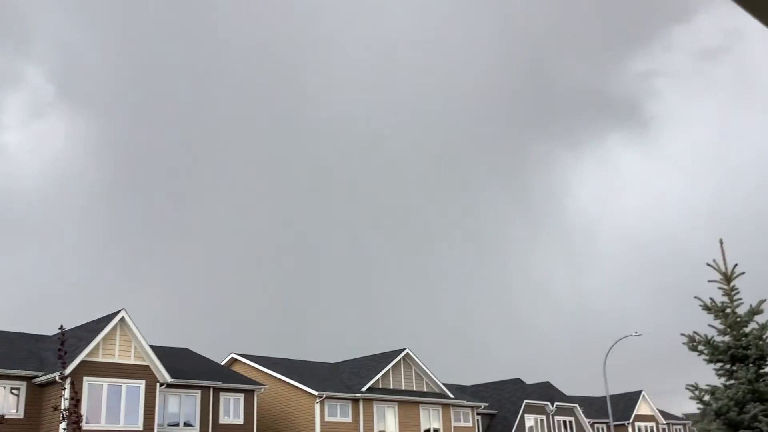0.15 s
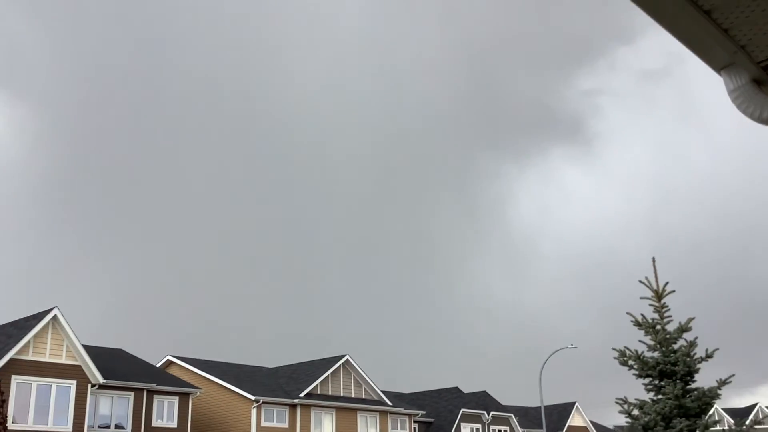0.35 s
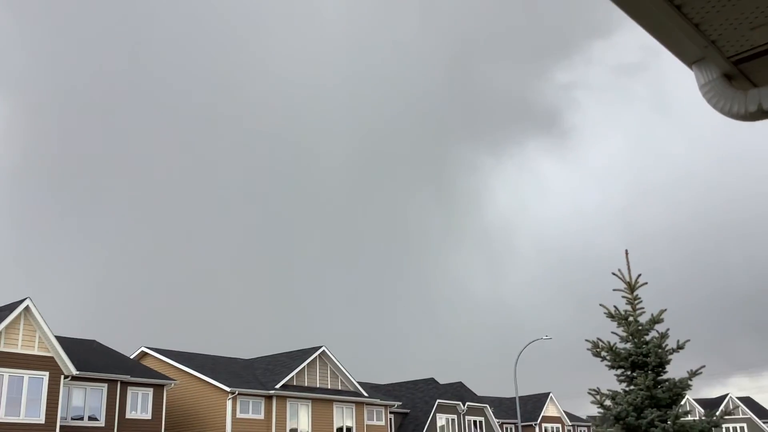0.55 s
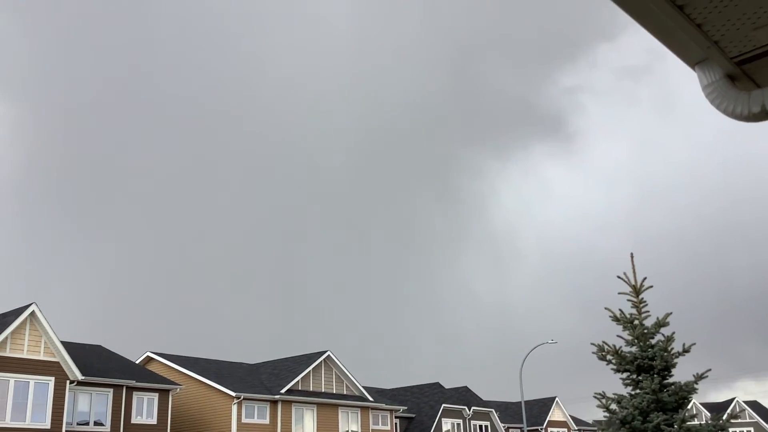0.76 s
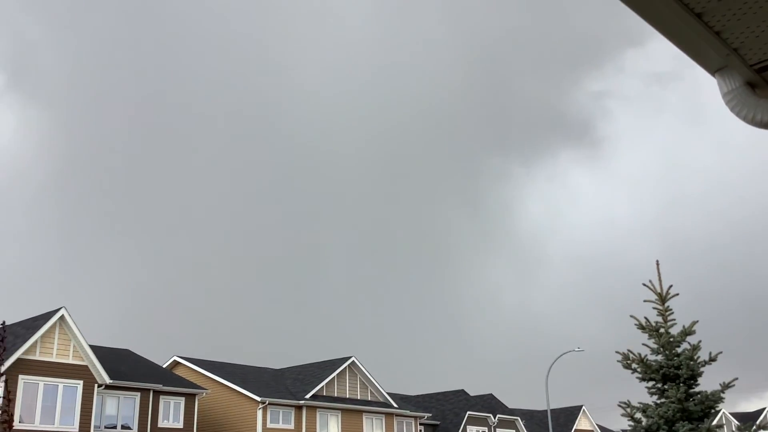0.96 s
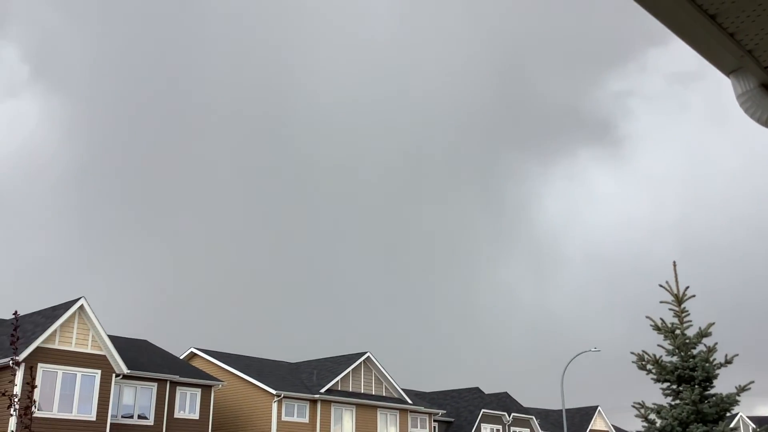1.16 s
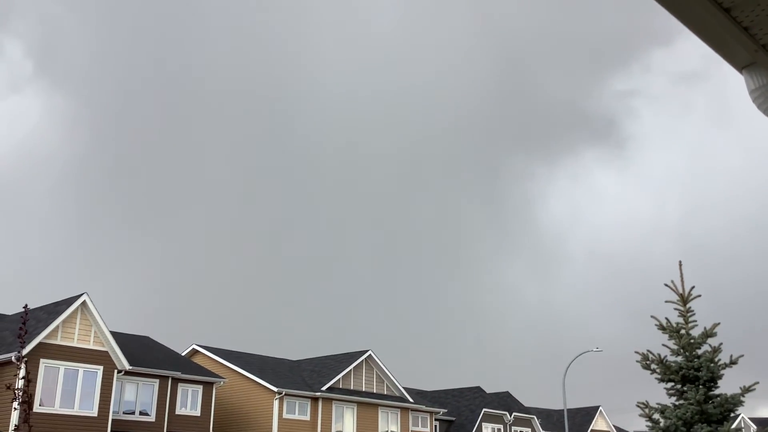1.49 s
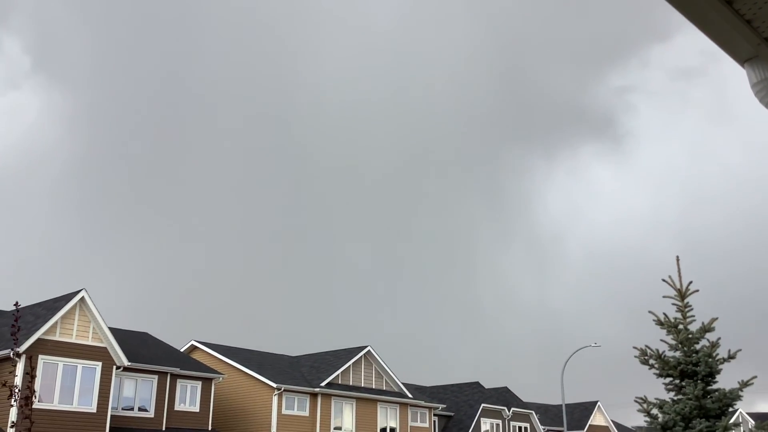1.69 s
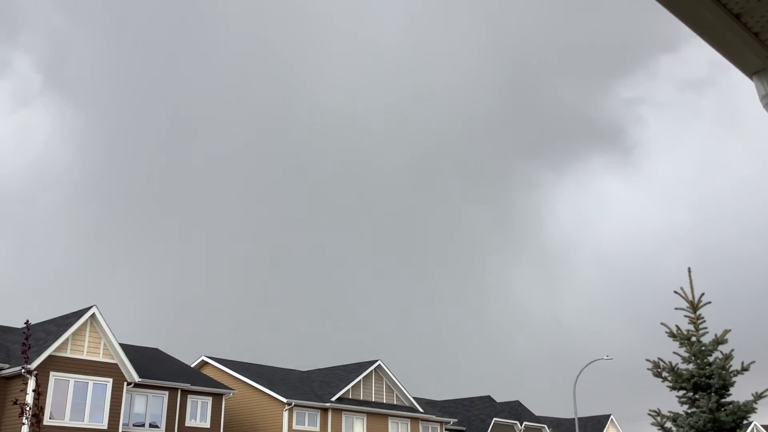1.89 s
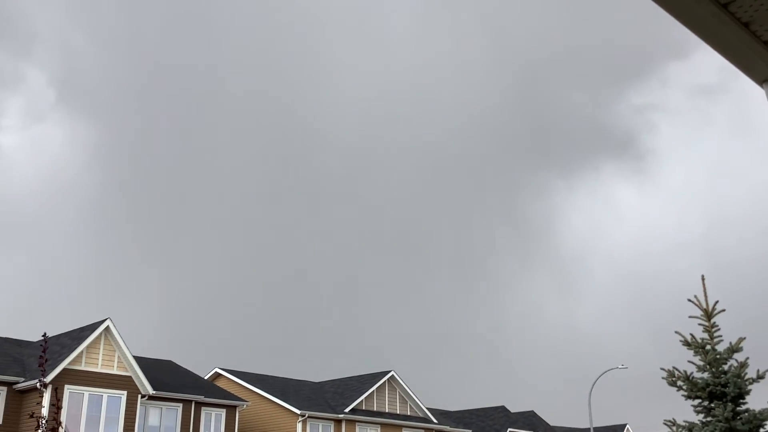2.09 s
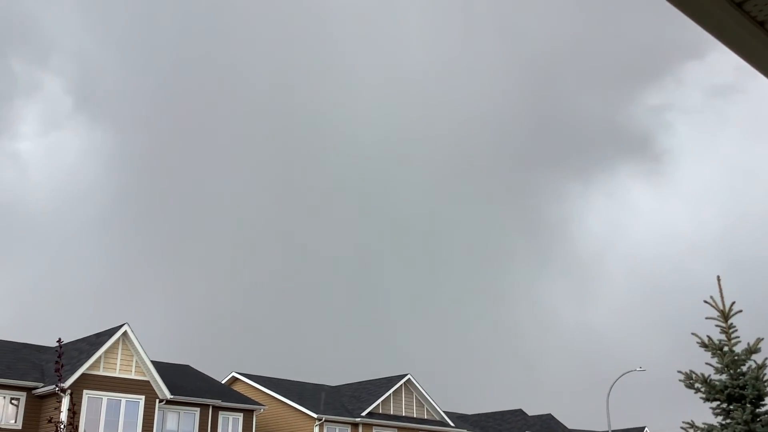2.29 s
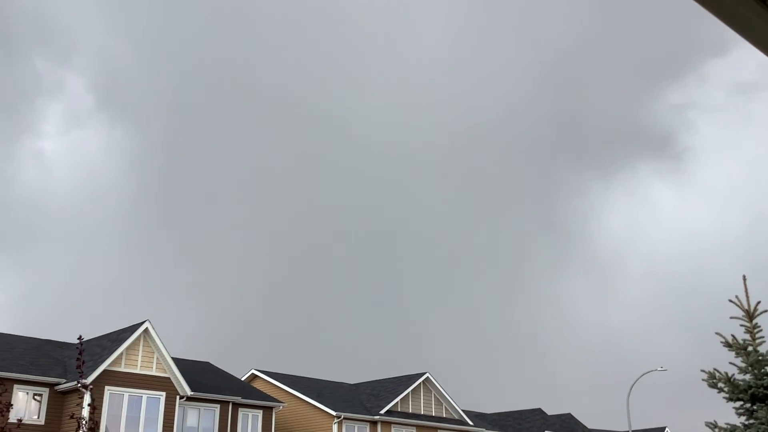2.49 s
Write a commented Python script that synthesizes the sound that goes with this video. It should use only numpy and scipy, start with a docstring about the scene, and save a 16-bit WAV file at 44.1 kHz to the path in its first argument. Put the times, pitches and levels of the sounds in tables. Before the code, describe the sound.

Close thunder breaks with a sudden, loud volley of cracks, then rolls on as a deep, crackling rumble that surges several times. Faint rain and a few nearby drips are heard from under the eaves on a residential street.

```python
"""Close thunder in light rain

Heard from under the eaves in a suburban street. Shock waves (N-waves) from the lightning channel arrive
as a dense volley, then as later claps over a rolling, tearing rumble. House fronts scatter them, the
porch reflects them, a few drops splash nearby, and a limiter holds down the loudest peaks."""
import sys
import numpy as np
from scipy import signal
from scipy.io import wavfile
from scipy.ndimage import uniform_filter1d, minimum_filter1d

SR = 44100
rng = np.random.default_rng(int(sys.argv[2]) if len(sys.argv) > 2 else 0)


def unload_wav(signal):
    """Save mono or channel-first audio to the path in sys.argv[1] as 16-bit WAV at rate SR, clipped to [-1, 1]."""
    wavfile.write(
        sys.argv[1],
        SR,
        np.round(np.clip(np.atleast_2d(signal).T, -1, 1) * 32767).astype(np.int16),
    )


N = 116865


def amp(db):
    """Amplitude ratio of a level in decibels."""
    return 10 ** (np.asarray(db) / 20)


def unit(x):
    """Normalisation to unit rms."""
    return x / np.sqrt(np.mean(x ** 2) + 1e-20)


def envelope(points):
    """Amplitude envelope through (t/s, level/dB) points."""
    return amp(np.interp(np.arange(N) / SR, *np.transpose(points)))


def at_frequency(points, hz):
    """Interpolation of (f/Hz, value) points on a logarithmic frequency axis."""
    f, value = np.transpose(points)
    return np.interp(np.log(hz + 1), np.log(f + 1), value)


def add(mix, start, sound):
    """Superposition of a sound on the mix, from a start time in seconds."""
    part = mix[max(round(start * SR), 0):][:len(sound)]
    part += sound[:len(part)]


def colour(x, spectrum, size=8192):
    """Minimum-phase filtering: a causal response with the given spectrum."""
    log_gain = np.log(amp(at_frequency(spectrum, abs(np.fft.fftfreq(size, 1 / SR)))))
    response = np.fft.ifft(np.exp(np.conj(signal.hilbert(log_gain)))).real
    return signal.fftconvolve(x, response[:size // 2])[:len(x)]


def arrivals(per_s, spread_db):
    """Poisson process: independent impulses of uneven size and random sign."""
    chance, size, sign = rng.random(N), rng.standard_normal(N), rng.choice([-1, 1], N)
    return (chance < per_s / SR) * sign * amp(spread_db * np.clip(size, -2, 2))


def steady(x, span_s):
    """Division by the running rms evens out slow swells and keeps the fast grain."""
    power = abs(uniform_filter1d(x ** 2, max(int(span_s * SR), 2)))
    return x / np.sqrt(power + 1e-12)


# Wash of distant drops: t/s, level/dB
RAIN_LEVEL = [(0, -52), (.8, -56), (2.65, -52.5)]
# Near drops: t/s, level/dB, decay time/s
NEAR_DROPS = [(0.021, -52, 0.019), (0.1, -44, 0.01), (.211, -47, .01), (.775, -50, 0.01),
              (1.021, -55, 0.0043), (1.2947, -40.5, 0.012), (1.617, -50, .025), (1.694, -52.5, 0.049),
              (1.929, -50, 0.027), (1.964, -45, 0.0032), (2.178, -47, .024), (2.368, -53, 0.053)]
# Spectra of the wash and of the spray: f/Hz, level/dB
RAIN_SPECTRUM = [(500, 11), (3500, 1.5), (5700, 4.5), (6400, -1), (7200, -0.5), (8000, -5.5), (9800, 0),
                 (11500, -8.5), (14200, -6), (16000, -26)]
SPRAY_SPECTRUM = [(1500, 8), (4000, -6), (5500, 3.5), (7800, -1), (9500, 3), (12500, -1.5), (14500, -5),
                  (16000, -9.5)]

def rain():
    """Impact noise: far drops sum to a ticking wash that comes in flurries; near ones burst into spray."""
    t, spray = np.arange(N) / SR, np.zeros(N)
    for start, db, decay in NEAR_DROPS:
        add(spray, start, amp(db) * np.exp(-t / decay))
    splash = rng.standard_normal(SR // 8) * np.exp(-t[:SR // 8] / 0.0035)
    ticks = unit(signal.fftconvolve(arrivals(per_s=93, spread_db=3), splash)[:N])
    flurry_db = 2 * np.interp(t / 0.025, np.arange(200), rng.standard_normal(200))  # new value every 25 ms
    patter = amp(flurry_db) * (rng.standard_normal(N) + amp(-7) * ticks)
    wash = envelope(RAIN_LEVEL) * unit(colour(patter, RAIN_SPECTRUM))
    return wash + spray * unit(colour(rng.standard_normal(N), SPRAY_SPECTRUM))


# Reverberation of the street: f/Hz, T60/s
STREET_T60 = [(80, 0.18), (300, 0.16), (2000, 0.94), (8000, 0.035)]

def street(x, directions=4, turn_s=0.03, delay_s=0.03):
    """Scattering: house fronts return different echoes for each direction; the treble dies first."""
    out, t = np.zeros(N), np.arange(N) / SR
    for k in range(directions):
        echoes = rng.standard_normal(SR) * (rng.random(SR) < 1200 / SR)
        hz, age, spectra = signal.stft(echoes, SR, nperseg=256)
        damping = amp(-60 * age / at_frequency(STREET_T60, hz)[:, None])
        tail = signal.istft(spectra * damping, SR, nperseg=256)[1]
        share = np.sin(np.pi / 2 * np.minimum((t / turn_s + k) % directions, 2))  # directions take turns
        add(out, delay_s, signal.fftconvolve(x * share, tail / np.linalg.norm(tail)))
    return amp(-11) * out


# Early reflections: delay/s, level/dB
PORCH_REFLECTIONS = [(.0038, -25), (0.0099, -18), (.027, -11)]

def porch(x):
    """Comb filtering: reflections from floor, wall and eaves interfere to give a hollow colour."""
    out = x.copy()
    for delay, db in PORCH_REFLECTIONS:
        add(out, delay, amp(db) * x)
    return out / np.sqrt(1 + sum(amp(db) ** 2 for _, db in PORCH_REFLECTIONS))


# Envelope of the roll: t/s, level/dB
ROLL_LEVEL = [(0, -34.5), (.215, -42.5), (.24, -12), (.59, -18.5), (.65, -20), (.98, -24), (1.08, -24),
              (1.29, -29.5), (1.44, -17.5), (1.56, -27), (1.64, -24), (1.9, -26.5), (2.0, -20), (2.17, -25),
              (2.45, -27), (2.65, -29)]
# Spectrum of the roll: f/Hz, level/dB
ROLL_SPECTRUM = [(25, -36), (50, -10), (75, 0.5), (115, 7.5), (190, 2), (320, 3), (500, -3), (750, -6),
                 (1200, -25.5), (5000, -89)]

def roll():
    """Incoherent summation: blunt shocks from far parts of the channel merge into a low roll."""
    shocks = colour(arrivals(per_s=900, spread_db=0), ROLL_SPECTRUM)
    return envelope(ROLL_LEVEL) * steady(shocks, span_s=0.057)


# Envelope of the tearing crackle: t/s, level/dB
TEAR_LEVEL = [(0, -33), (.092, -46.5), (.108, -34), (.15, -36.5), (.178, -23), (.195, -36.5), (.224, -33.5),
              (.232, -22.5), (.33, -19), (.362, -24), (.38, -19), (.6, -22), (.76, -28.5), (.99, -28.5),
              (1.02, -23), (1.13, -30), (1.29, -32.5), (1.34, -28), (1.5, -29), (1.9, -33), (1.95, -27.5),
              (2.25, -31.5), (2.37, -27), (2.5, -38.5), (2.56, -28)]
# Spectra of near and far shocks: f/Hz, level/dB
NEAR_SPECTRUM = [(100, -26), (400, -1.5), (750, -3), (1100, -5), (1900, -1), (2500, -8), (3100, -17),
                 (3800, -32), (5600, -33.5), (8000, -63), (16000, -110)]
FAR_SPECTRUM = [(100, -53.5), (400, 16), (750, 14), (1150, 15), (1700, 10), (2200, 2), (2800, -12),
                (3500, -26.5), (5600, -42), (16000, -65.5)]

def tear(near_until_s=0.14, far_from_s=2.8):
    """Attenuation with distance: small sharp shocks crackle, losing treble as their paths lengthen."""
    shocks = arrivals(per_s=2000, spread_db=4)
    far = np.clip((np.arange(N) / SR - near_until_s) / (far_from_s - near_until_s), 0, 1)
    crackle = (1 - far) * colour(shocks, NEAR_SPECTRUM) + far * colour(shocks, FAR_SPECTRUM)
    return envelope(TEAR_LEVEL) * steady(crackle, span_s=0.19)


# Hiss behind the sharpest cracks: t/s, level/dB, rise time/s, decay time/s
SIZZLE_BURSTS = [(.065, -45.5, 0.0094, 0.044), (0.227, -34, 0.00074, 0.018), (0.279, -39, 0.0044, 0.079),
                 (.368, -34.5, .01, .12), (1.003, -36, 0.0048, 0.028)]
# Spectrum of the hiss: f/Hz, level/dB
SIZZLE_SPECTRUM = [(1500, -10.5), (3000, 11.5), (4500, 4), (5900, 1), (6500, -7), (9500, -15.5),
                   (12000, -35), (16000, -46)]

def sizzle():
    """Temporal spreading: the treble of the sharpest cracks smears into a short hiss."""
    bursts, t = np.zeros(N), np.arange(N) / SR
    for start, db, rise, decay in SIZZLE_BURSTS:
        shape = np.minimum(t / rise, 1) * np.exp(-np.maximum(t - rise, 0) / decay)
        add(bursts, start, amp(db) * shape)
    return bursts * unit(colour(arrivals(per_s=3500, spread_db=2), SIZZLE_SPECTRUM))


# Dry cracks: t/s, level/dB, decay time/s
CRACK_BURSTS = [(0.098, -23, 0.0053), (.228, -6, 0.015), (0.291, -13.5, 0.0069), (.336, -9, 0.0098),
                (.348, -2.5, 0.0031), (0.382, -10, .005), (.411, -8, 0.013), (0.552, -19, 0.0086),
                (1.488, -24.5, 0.023), (2.188, -27, 0.0086)]
# Spectrum of the cracks: f/Hz, level/dB
CRACK_SPECTRUM = [(100, 0), (700, 10.5), (1200, 1), (2300, 2.5), (3100, -13.5), (3900, -31), (6000, -30),
                  (8500, -46), (16000, -79)]

def cracks():
    """Shot noise: tight, exponentially decaying bunches of sharp shocks snap out of the roar."""
    bursts, t = np.zeros(N), np.arange(N) / SR
    for start, db, decay in CRACK_BURSTS:
        add(bursts, start, amp(db) * np.exp(-t / decay))
    shocks = arrivals(per_s=6500, spread_db=1.5)
    return colour(bursts * shocks, CRACK_SPECTRUM) / np.std(colour(shocks, CRACK_SPECTRUM))


# Low thuds: t/s, level/dB, f/Hz, duration/s
BOOM_PULSES = [(0.021, -19, 140, .021), (0.079, -19.5, 298, 0.0077), (0.195, -19.5, 255, 0.012),
               (0.241, -14, 65.3, 0.044), (0.336, -10.5, 82, 0.037), (0.546, -8.5, 109, 0.071),
               (1.002, -9, 125.2, 0.038), (1.401, -9, 111, 0.033), (1.465, -8.5, 189, 0.018),
               (1.499, -11, 216, 0.012), (1.557, -11, 224, 0.015), (1.934, -6.5, 123, 0.03),
               (2.011, -11.5, 217.3, 0.035), (2.092, -16, 135, 0.026)]

def booms(jitter=0.12, second_harmonic=0.21, low_cut_hz=45):
    """Quasi-periodicity: a few blunt shocks in quick, uneven succession fuse into one pitched thud."""
    out = np.zeros(N)
    for start, db, hz, duration in BOOM_PULSES:
        t = np.arange(0, duration, 1 / SR)
        pace = np.exp(jitter * np.interp(t * hz, np.arange(20), rng.standard_normal(20)))
        phase = 2 * np.pi * np.cumsum(hz * pace) / SR
        wave = np.sin(phase) + second_harmonic * np.sin(2 * phase)
        add(out, start, amp(db) * np.sin(np.pi * t / duration) * wave)
    return signal.sosfilt(signal.butter(2, low_cut_hz, "highpass", fs=SR, output="sos"), out)


def n_wave(ms):
    """N-wave: pressure jumps up, falls linearly through zero and jumps back."""
    half = ms * SR / 2000
    n = np.arange(int(2 * half) + 2)
    return (1 - n / half) * np.clip(2 * half - n, 0, 1)


# Claps: t/s, relative level/dB, N-wave duration/ms, swarm decay time/s, corner f/Hz of the front
CLAP_SHOCKS = [(0.047, -14, 2.13, 0.0028, 1500), (.229, 0.5, 2.6, 0.0086, 3950),
               (.252, -2, 2.5, 0.0068, 2030), (.292, -0.5, 3.1, 0.015, 2980),
               (0.31, 4.5, 2.1, 0.0077, 1400), (.383, 4.5, 3.6, 0.0099, 3030), (.411, 1.5, 4.5, 0.03, 2500),
               (0.474, 2, 5.2, 0.0067, 1510), (.496, 4, 5.23, 0.016, 1510), (0.556, 1.5, 4.7, 0.011, 1480),
               (.581, 0, 5.37, 0.022, 1490), (.655, -6.5, 12.3, 0.093, 500), (0.839, -8, 3.75, 0.011, 1200),
               (.940, -9, 3.8, 0.014, 890), (1.003, 5.5, 3.7, 0.0032, 1090),
               (1.014, -3, 2.34, 0.0063, 1310), (1.068, -16.5, 3.25, 0.011, 1200),
               (1.328, -14.5, 2.36, 0.068, 1220), (1.4, 5, 3.56, 0.011, 487),
               (1.461, -5.5, 3.15, 0.04, 810), (1.545, -8.5, 3.13, 0.052, 680),
               (2.000, -9.5, 3.4, 0.025, 493), (2.098, -7.5, 2.78, 0.024, 720)]
# Transmission through the air: f/Hz, level/dB
AIR_RESPONSE = [(25, -39), (50, -30), (85, -3), (300, 4), (1000, 0.5), (2100, 2), (2800, -1), (3700, -7.5),
                (5800, -29), (7500, -53), (16000, -71)]

def claps(followers_per_s=1500, follower_db=4.5, duration_ratio=1.295):
    """Shock propagation: an N-wave leads a dying swarm of shorter and longer ones, dulled by the air."""
    out, t = np.zeros(N), np.arange(SR // 4) / SR
    for start, db, ms, decay, front_hz in CLAP_SHOCKS:
        lead, swarm = n_wave(ms), np.zeros(len(t))
        for stretch in duration_ratio ** np.linspace(-2, 1, 4):
            hits = rng.standard_normal(len(t)) * (rng.random(len(t)) < followers_per_s / SR)
            followers = signal.fftconvolve(hits * np.exp(-t / decay), n_wave(ms * stretch))
            add(swarm, len(lead) / SR / 2, followers)
        energy = np.sum(swarm ** 2) + 1e-12
        swarm *= amp(follower_db) * np.sqrt(decay * SR / 6 / energy)
        add(swarm, 0, lead)
        pole = np.exp(-2 * np.pi * front_hz / SR)  # a two-pole low-pass rounds the fronts
        rounded = signal.lfilter([(1 - pole) ** 2], [1, -2 * pole, pole * pole], swarm)
        add(out, start, amp(db) * rounded)
    return colour(out, AIR_RESPONSE)


def scene():
    """Linear superposition of thunder, its echoes and the rain, in one channel."""
    shocks = amp(-6) * claps() + booms()
    thunder = porch(shocks + street(shocks) + roll() + tear())
    return (thunder + cracks() + sizzle() + rain())[None]


def record(dry):
    """Peak limiting, then band limiting: the gain dips around loud peaks and the top treble is cut."""
    ceiling, window, cutoff_hz = 0.93, 140, 15750
    needed_gain = minimum_filter1d(ceiling / np.maximum(abs(dry), ceiling), window)
    gain = uniform_filter1d(needed_gain, window // 2)
    limited = dry * uniform_filter1d(gain, window // 2)
    low_pass = signal.firwin(511, cutoff_hz, window=("kaiser", 9), fs=SR)
    return signal.oaconvolve(limited, low_pass[None], "same")


dry = scene()
out = record(dry)
unload_wav(out)
```